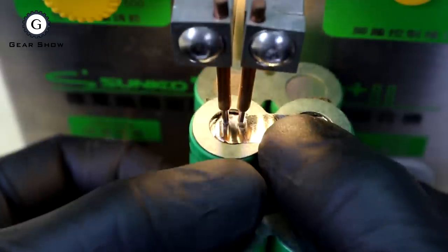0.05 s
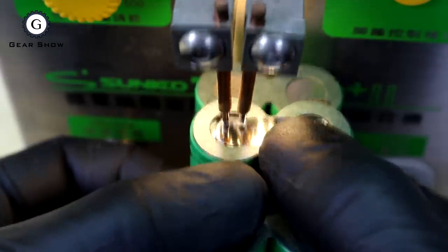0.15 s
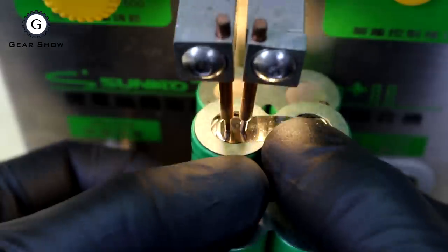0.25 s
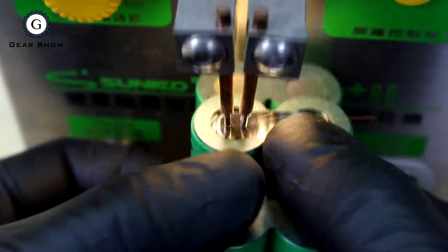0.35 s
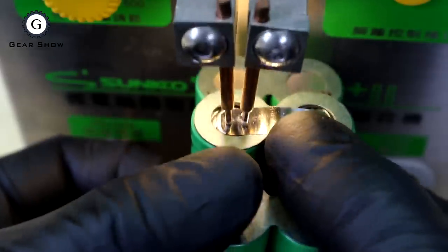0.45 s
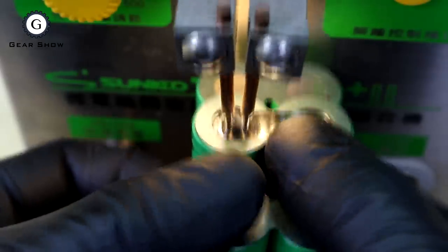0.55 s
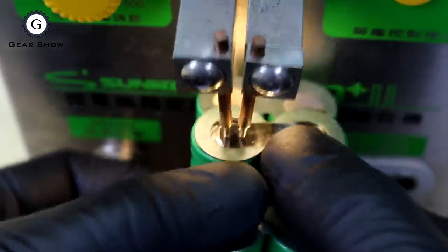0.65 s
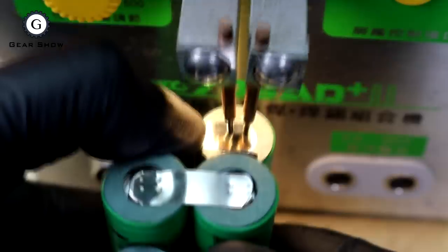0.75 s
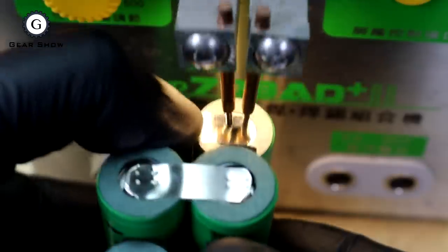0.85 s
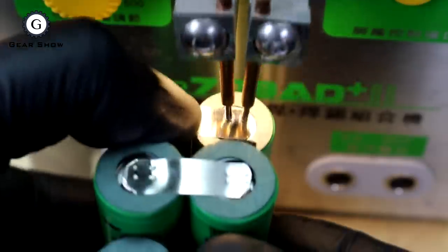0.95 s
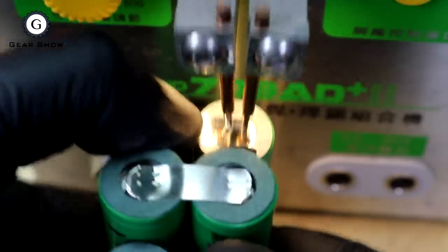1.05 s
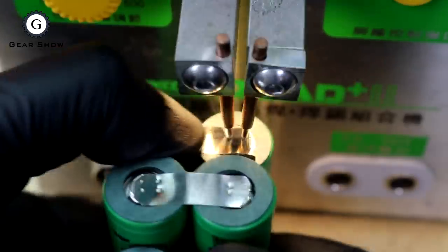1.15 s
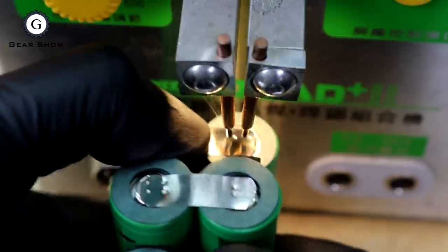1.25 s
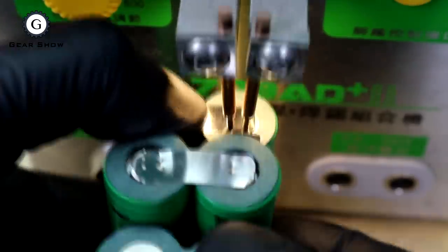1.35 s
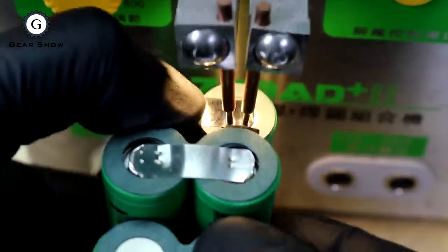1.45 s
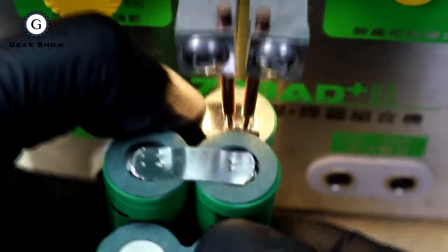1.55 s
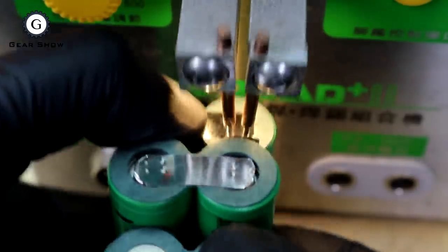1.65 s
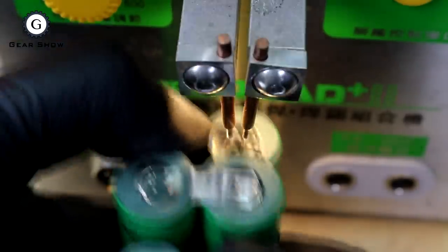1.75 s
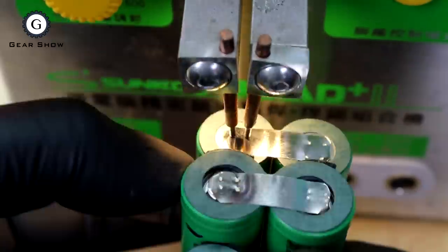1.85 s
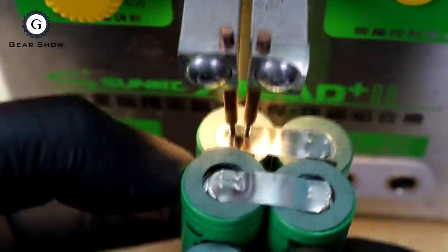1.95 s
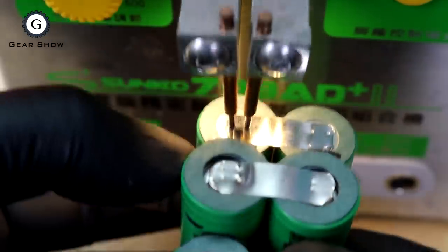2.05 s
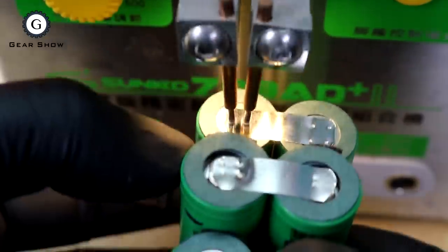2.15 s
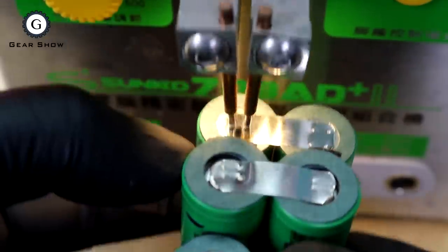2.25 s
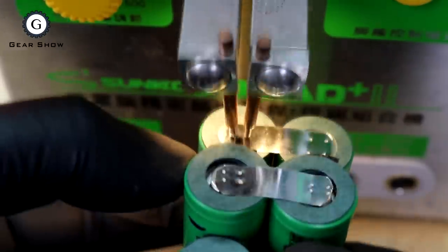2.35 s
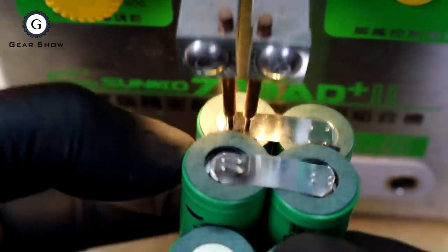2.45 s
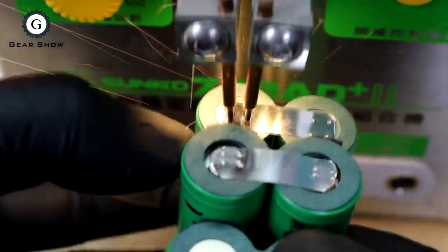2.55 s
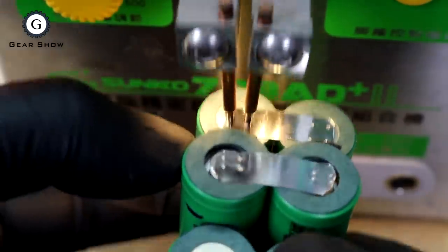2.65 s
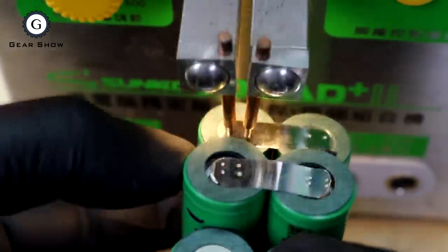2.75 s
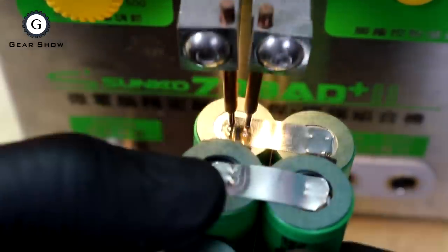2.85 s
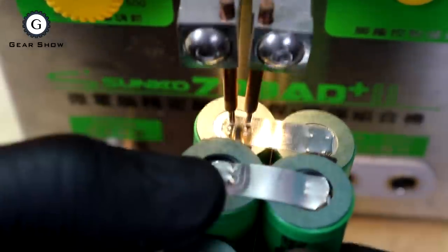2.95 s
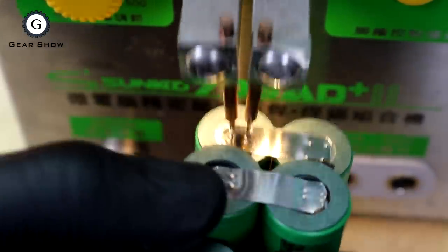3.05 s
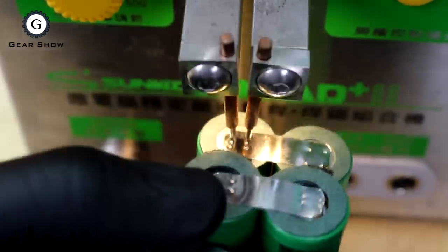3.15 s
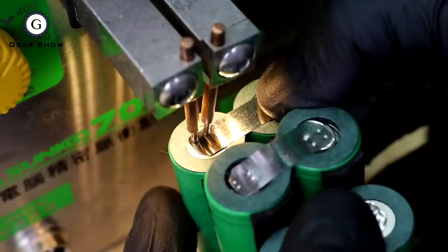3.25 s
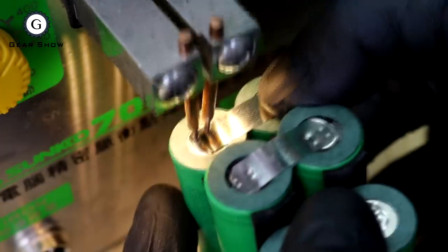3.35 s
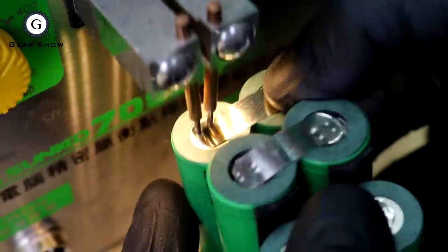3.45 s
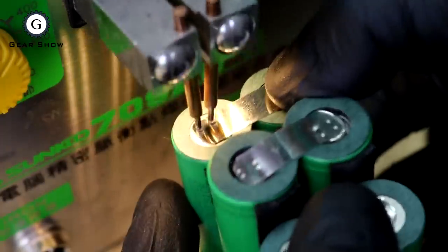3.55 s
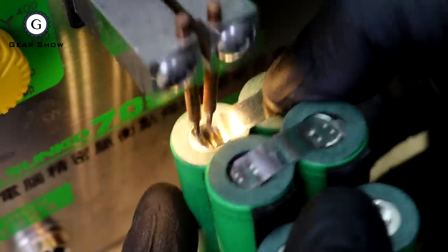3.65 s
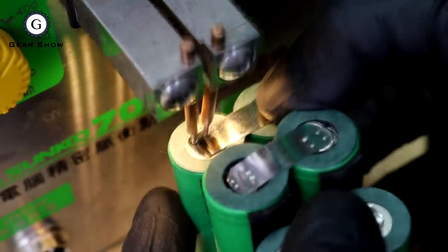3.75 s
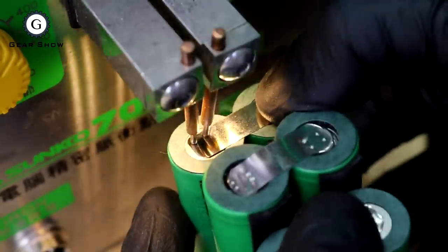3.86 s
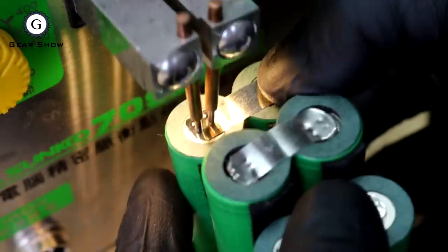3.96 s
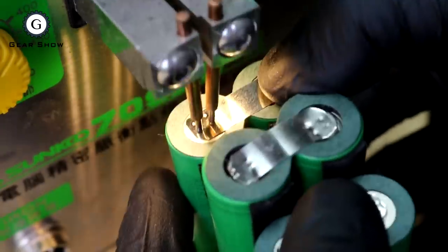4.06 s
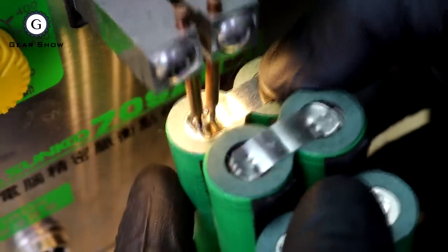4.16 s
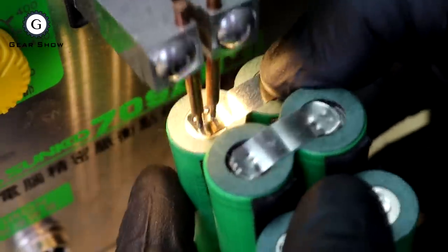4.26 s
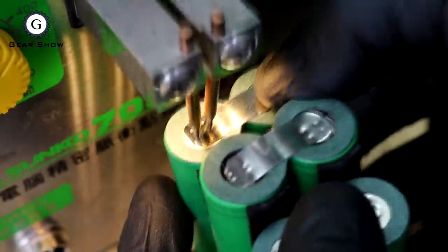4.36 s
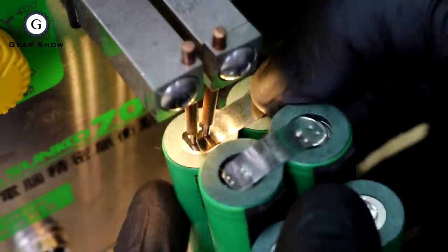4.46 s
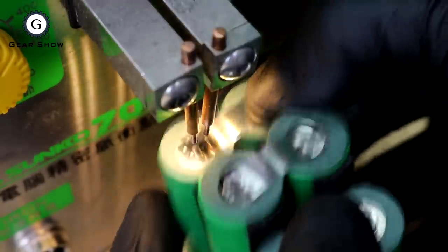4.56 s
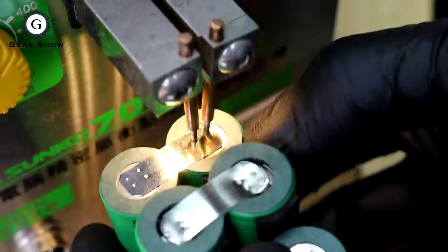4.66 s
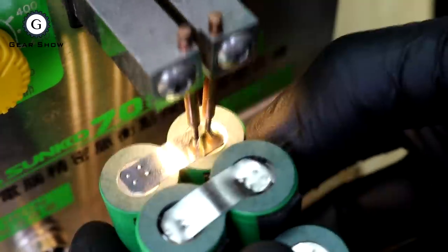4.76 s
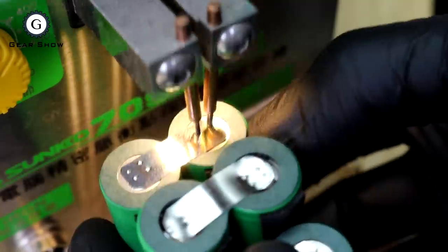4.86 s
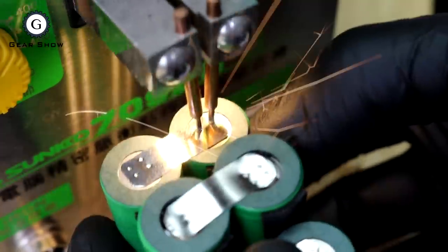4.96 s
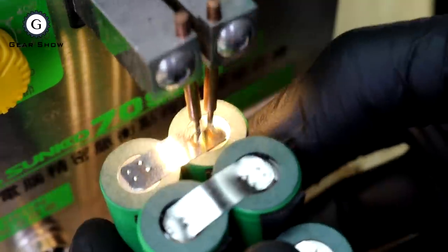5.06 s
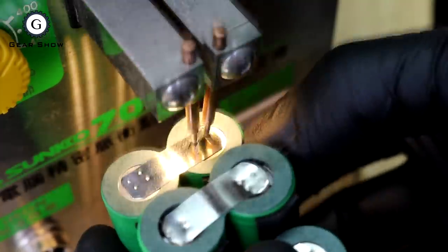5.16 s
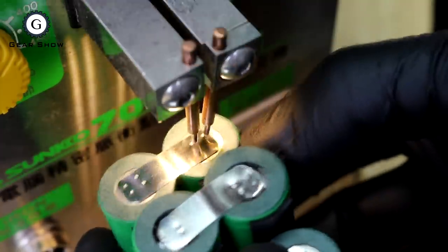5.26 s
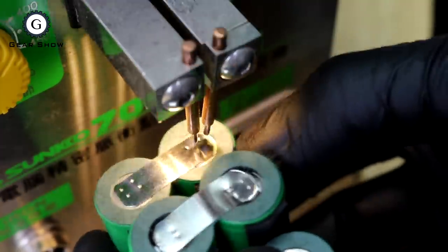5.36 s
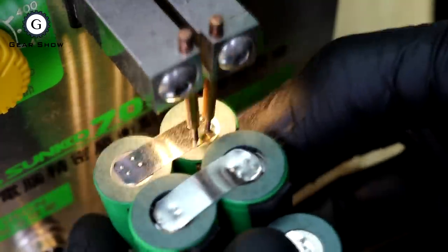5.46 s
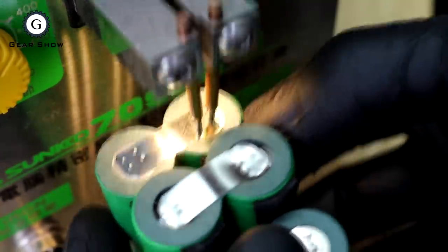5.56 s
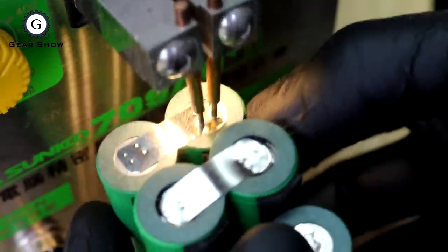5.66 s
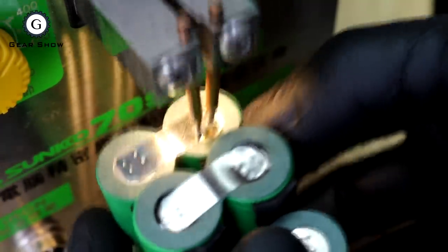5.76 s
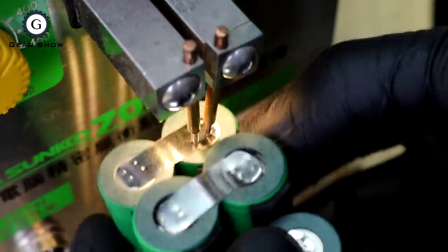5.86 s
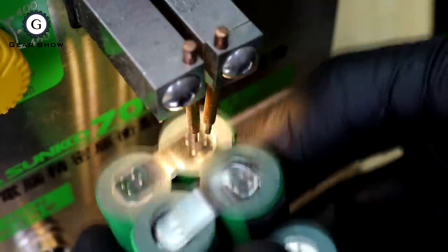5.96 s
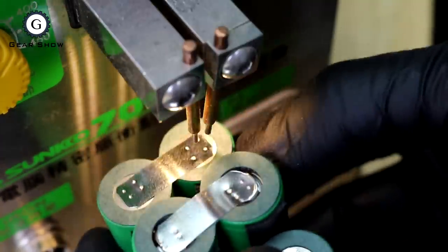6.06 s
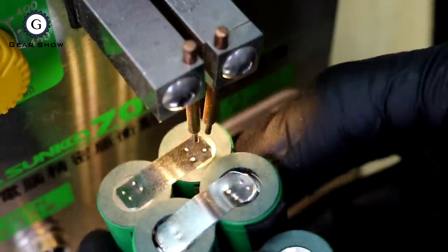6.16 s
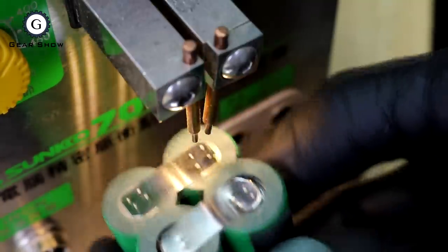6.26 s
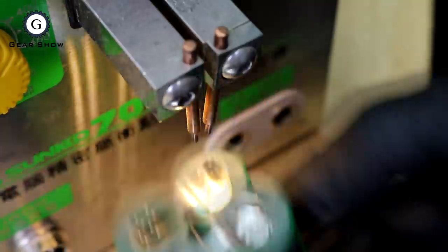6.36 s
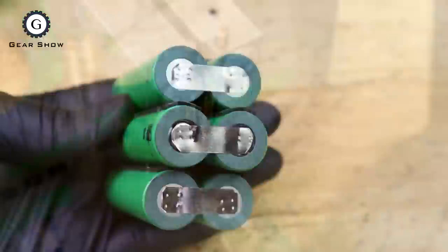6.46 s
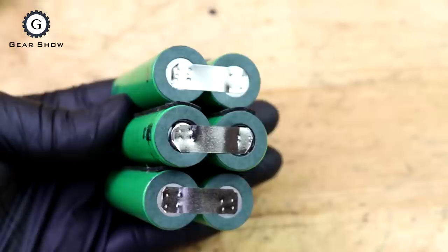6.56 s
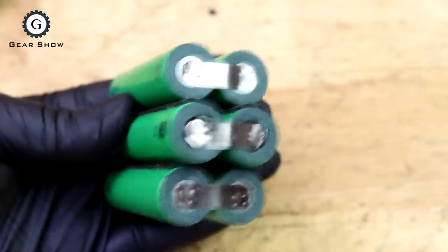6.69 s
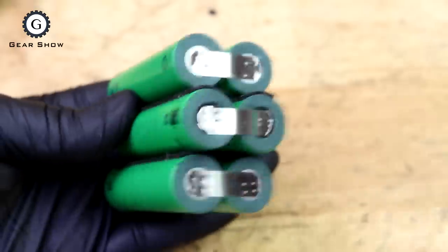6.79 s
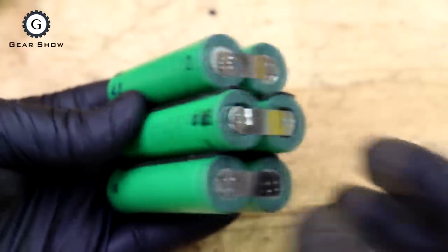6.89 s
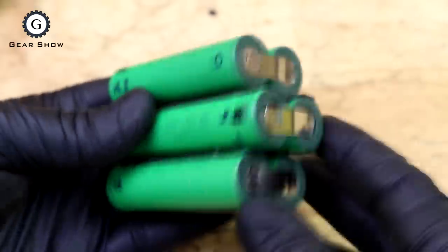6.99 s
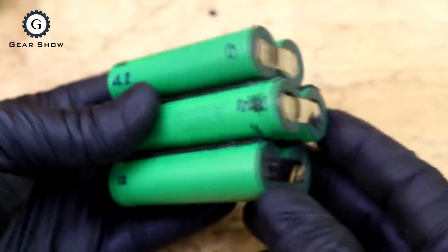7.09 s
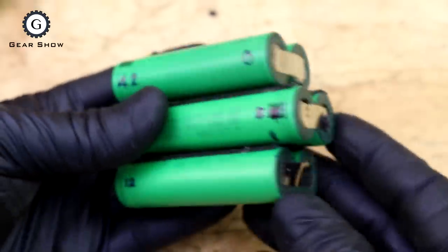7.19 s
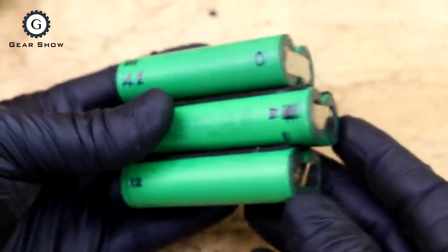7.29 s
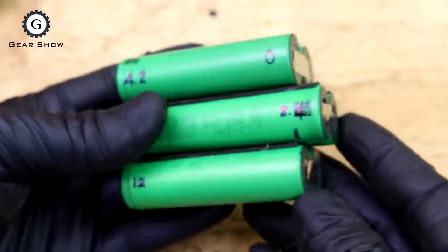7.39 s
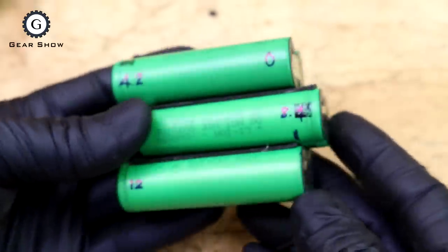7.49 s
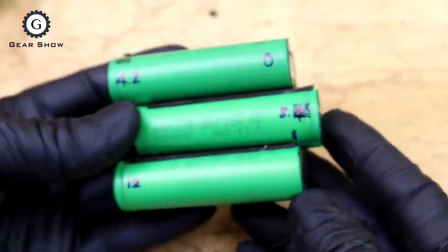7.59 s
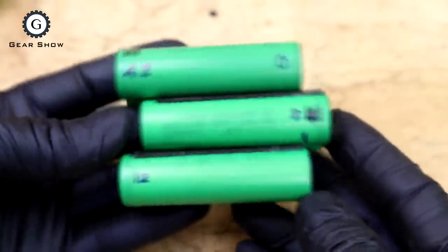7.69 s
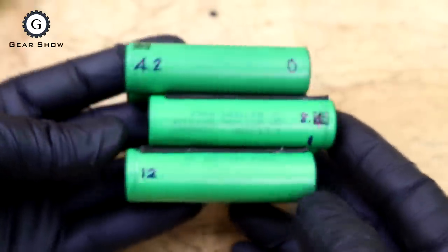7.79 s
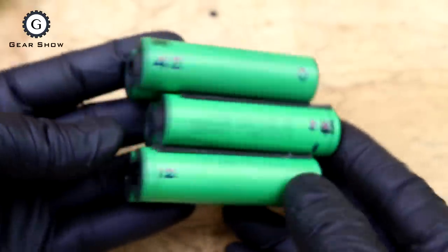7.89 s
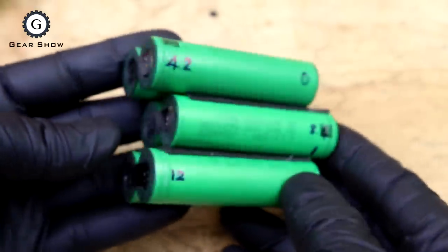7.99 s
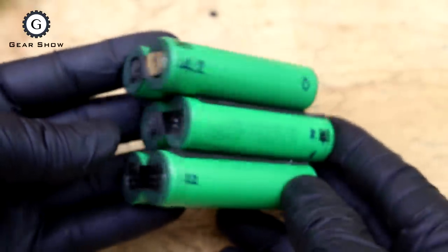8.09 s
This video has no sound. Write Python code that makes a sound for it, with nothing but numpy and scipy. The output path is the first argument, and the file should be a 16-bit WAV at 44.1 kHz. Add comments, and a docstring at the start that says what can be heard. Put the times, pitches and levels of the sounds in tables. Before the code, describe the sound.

A small spot welder fires sharp metallic snaps one after another up close, each followed by a switch click and dull thud, over faint fan whine.

```python
"""A bench spot welder heard close up, weld after weld, the waits between them cut out.
The switch closes and two half-cycles of mains current jolt the steel cabinet: decaying modes and rattling noise.
Sparks crack now and then as damped sines with a noise echo; the switch ticks over and back, as a resonant housing
excited by noise; the arm thuds on its stop through the same cabinet, and loose parts ring on.
Throughout, a fan whines in narrow noise bands over the workshop air; at the end gloves rub in swells of noise."""
import sys
import numpy as np
from scipy import signal
from scipy.fft import rfft, irfft, next_fast_len
from scipy.io import wavfile
from scipy.ndimage import uniform_filter1d

SR = 44100
rng = np.random.default_rng(int(sys.argv[2]) if len(sys.argv) > 2 else 0)


def int16_out(signal):
    """Quantize to a 16-bit WAV file."""
    q = np.round(np.clip(np.atleast_2d(signal).T, -1, 1) * 32767)
    wavfile.write(sys.argv[1], SR, q.astype(np.int16))


def magnitude_from_level(level_db):
    """Linear magnitude for a level in decibels (20 dB per decade)."""
    exponent = np.asarray(level_db, float) / 20
    return 10 ** exponent


N = 358529

# Starts of the sections, in seconds; the last section is away from the welder.
CUT_S = [0, 0.292, 0.773, 1.371, 1.932, 2.491, 2.851, 3.252, 3.972, 4.732, 5.452, 6.552]
# Sparks. Each row: start in seconds, ring level in dB, ring frequency in Hz, ring t60 in seconds,
# echo level in dB.
SPARK_EVENTS = [(0.4589, -11, 3150, 0.013, -62), (2.5865, -1.5, 3150, 0.0054, -27)]


def unit(x):
    """Normalization: a signal divided by its root mean square has rms 1."""
    return x / np.sqrt(np.mean(x ** 2))


def fall(t, t60):
    """Exponential decay: a linearly damped vibration loses 60 dB in each t60."""
    return np.exp(-np.log(1000) * t / np.maximum(t60, 1e-3))


def along(hz, table):
    """Log-frequency interpolation: (Hz, value) rows are joined linearly per octave."""
    at, value = np.transpose(sorted(table))
    return np.interp(np.log(np.maximum(hz, 1)), np.log(at), value)


def noise(db_at):
    """Spectral shaping: white noise is weighted by a given function from Hz to dB."""
    size = next_fast_len(N)
    hz = np.arange(size // 2 + 1) * SR / size
    white = rfft(rng.standard_normal(size))
    return irfft(white * magnitude_from_level(db_at(hz)), size)[:N]


def walk(rate):
    """Slow random modulation: random levels, rate per second, joined by two moving averages."""
    hold = int(SR / rate)
    steps = np.repeat(rng.standard_normal(N // hold + 1), hold)
    return uniform_filter1d(uniform_filter1d(steps, hold), hold)[:N]


def add(out, s, sound):
    """Superposition: a sound is summed in from s seconds; the next cut silences its tail."""
    start = int(s * SR)
    end = min([int(c * SR) for c in CUT_S if c > s] + [N, start + len(sound)])
    out[start:end] += sound[:end - start]


def jolts():
    """Magnetic impulse: each half-cycle of current, and each spark, is a blow (s, dB in five bands)."""
    # Each row: start in seconds, thump in dB, share 0-1 of the thump's power in the second half-cycle,
    # clank (1.6 kHz) in dB, crack (3.2 kHz) in dB.
    welds = [(0.06, -16.5, 0.13, -24, -22.5), (0.457, -25, 0.3, -24.5, -22),
             (0.9374, -19.5, 0.26, -28.5, -32.5), (1.4848, -18, 0, -19.5, -29.5),
             (2.1594, -23, 0.71, -15.5, -25.5), (2.5745, -23.5, 0.9, -16.5, -35.5),
             (2.927, -23.5, 0.92, -21, -33), (3.5611, -18, 0.06, -24.5, -32.5),
             (4.204, -17, 0.04, -24, -35), (4.9876, -17.5, 0.08, -24, -24), (5.6615, -26, 0.24, -26, -30)]
    # 8 kHz drive of the first half-cycle in dB, one value a weld.
    fizz = [-36.5, -35, -37, -38.5, -45, -41, -47, -42, -42.5, -31, -33.5]
    # 800 Hz drive in dB relative to the thump: first and second half-cycle.
    panel_db = (-6.5, -9)
    # Drive of the second half-cycle in dB: at 1.6, 3.2 and 8 kHz.
    later_db = (-22.5, -28, -51.5)
    # Drive from a spark in dB over its echo: at 1600, 350, 800, 3200 and 8000 Hz.
    spark_blow_db = (9.5, -13, -15.5, 1, 5)
    half_cycle_s = 0.0105
    blows = [(s, *(echo_db + np.array(spark_blow_db))) for s, _, _, _, echo_db in SPARK_EVENTS]
    for (s, thump_db, late, clank_db, crack_db), fizz_db in zip(welds, fizz):
        shares = np.clip([1 - late, late], .005, 1)
        first_db, second_db = thump_db + 10 * np.log10(shares)
        blows.append((s, clank_db, first_db, thump_db + panel_db[0], crack_db, fizz_db))
        blows.append((s + half_cycle_s, later_db[0], second_db, thump_db + panel_db[1], *later_db[1:]))
    return blows


def landings():
    """Contact stiffness: the softer the arm lands, the duller the blow (s, dB in five bands)."""
    # The arm knocking and bouncing on its stop. Each row: start in seconds, drive at 350 Hz in dB,
    # softness in dB, drive at 800 Hz in dB.
    thuds = [(0.478, -22.5, 18, -45), (0.6916, -46, -3, -48), (0.7326, -21.5, 17, -41),
             (1.1942, -23, 6, -32.5), (1.2745, -36, 6.5, -60), (1.7423, -22.5, 5, -31),
             (2.082, -44.5, 7, -58), (2.425, -24, 4.5, -33), (2.4532, -28.5, 11, -47),
             (2.805, -24, 5, -31.5), (2.8317, -28, 23, -47), (3.1656, -22, 0, -27.5), (3.84, -26, 7, -42.5),
             (4.5141, -18.5, 9.5, -29), (4.5244, -36.5, -9, -42), (4.5958, -39.5, -0.6, -42.5),
             (5.222, -18.5, 6.5, -28), (5.682, -23, 6, -37.5), (5.9101, -21.5, 4, -26),
             (5.9642, -35.5, 18, -52)]
    # Rows for 1.6, 3.2 and 8 kHz: drive of a hard landing in dB over its 350 Hz,
    # dB lost per dB of softness.
    landing = [(-6.5, 0.91), (-13.5, 1), (-23, 1.1)]
    hard_db, share = np.transpose(landing)
    blows = []
    for s, db, soft_db, panel_db in thuds:
        upper = db + hard_db - share * soft_db
        blows.append((s, upper[0], db, panel_db, *upper[1:]))
    return blows


def cabinet(blows, bass_db, ring_db, head_db, head_s, rise_cycles, scatter, top_db, weight,
            low_rattle_db, knock_db):
    """Modal superposition: every blow rings the same modes, shakes the panels and fills the room."""
    # Frequencies in Hz of the five drive levels of a blow.
    colour_hz = [1600, 350, 800, 3200, 8000]
    # Cabinet modes. Each row: frequency in Hz, relative level in dB, t60 in seconds.
    modes = [(105, 7, 0.19), (152.6, -12, 0.43), (204.5, -6.5, 0.37), (242, -2, 0.53), (272, -5.5, 0.3),
             (346.2, 6, 0.35), (365.7, 7.5, 0.14), (421, 7, 0.2), (473.6, -0.5, 0.3), (614.3, 1.5, 0.17),
             (750.7, 7.5, 0.28), (785.6, 4, 0.36), (952, 1.5, 0.2), (1021, -5, 0.33), (1210, -8.5, 0.084),
             (1166, 3, 0.1), (1430, -4, 0.15), (1551, -2, .3), (1673, 1.5, 0.067), (1693, -3.5, 0.18),
             (2055, -3.5, 0.12), (2270, -6, 0.16), (2560, -15, 0.13), (3027, -12.5, 0.64),
             (3150, -7.5, 0.067), (3353, -5.5, 0.24), (4170, -10.5, 0.26)]
    # Loose panels and the room's answer. Each row: band centre in Hz, relative rattle level in dB,
    # rattle t60 in seconds, relative room level in dB, room t60 in seconds.
    rattle = [(141, -4, 0.029, -12.5, 0.2), (346, -8.5, 0.099, -22, 0.69), (722, -10, 0.035, -14.5, 0.38),
              (1175, -2.5, 0.034, -20, 0.36), (1610, -3, 0.05, -26, 0.52), (2630, -8.5, 0.059, -22, 0.33),
              (3400, -3.5, 0.03, -25.5, .28), (5200, -0.5, 0.02, -26.5, 0.3), (7340, -4, 0.015, -23, .17),
              (9150, -0.5, 0.011, -29, 0.25), (13500, 1, 0.012, -30, 0.2)]
    mode_shift = .018  # full spread of each mode's pitch from blow to blow, as a share
    out, t = np.zeros(N), np.arange(SR // 2) / SR
    hz, db, t60 = np.array(modes).T[:, :, None]
    # a push of finite length: each mode takes some cycles to build
    rings = (1 - np.exp(-t * hz / rise_cycles)) ** 2 * fall(t, t60)
    rings *= magnitude_from_level(db + ring_db + bass_db * (hz < 170) + knock_db * (np.abs(hz - 355) < 35))

    centre, rattle_db, rattle_t60, room_db, room_t60 = np.array(rattle).T[:, :, None]
    shape = magnitude_from_level(rattle_db) * fall(t, rattle_t60)
    shape += magnitude_from_level(room_db) * fall(t, room_t60) * (1 - fall(t, 0.025))
    shape *= magnitude_from_level(low_rattle_db * (centre < 1000) + top_db * (centre > 11000))
    shape *= (1 - np.exp(-t * centre / rise_cycles)) ** 2
    bands = np.array([unit(noise(lambda f: -90 * np.log2(np.maximum(f, 1) / c) ** 2))
                      for c in centre[:, 0]])
    bands = bands * magnitude_from_level(3.8 * walk(300))  # the rattle comes in grains

    chance = rng.random((len(blows), 2 * len(hz) + 1))
    # a blow that follows at once lands on the same spot and starts the modes alike
    for k in np.flatnonzero(np.abs(np.diff(np.array(blows)[:, 0])) < .015):
        chance[k + 1, 1:] = chance[k, 1:]
    for (s, *colour_db), luck in zip(blows, chance):
        colour = list(zip(colour_hz, colour_db))
        start, shift = luck[1:].reshape(2, -1, 1) - .5
        turns = scatter * start + hz * (1 + mode_shift * shift) * t
        ring = magnitude_from_level(along(hz[:, 0], colour)) @ (rings * np.sin(2 * np.pi * turns))
        # a heavier blow puts relatively more into the first knock
        knock = magnitude_from_level(head_db + weight * (colour_db[1] + 25.5))
        ring = ring * (1 + knock * np.exp(-(t / head_s) ** 2))
        at = int(luck[0] * (N - len(t)))
        gains = magnitude_from_level(along(centre[:, 0], colour))
        add(out, s, ring + gains @ (shape * bands[:, at:at + len(t)]))
    return out


def sparks():
    """Impulsive discharge: a few sharp damped cycles, then a noise echo whose treble dies first."""
    # Each row: multiple of the ring frequency, relative level in dB at a ring level of 0 dB.
    partials = [(1, 0), (1.22, -3), (1.54, 0.5), (2.1, -3)]
    edge = 1  # dB that the upper partials lose, beyond the first, per dB of a weaker spark
    rise_s = .00008
    out, t = np.zeros(N), np.arange(SR // 2) / SR
    body_band = signal.butter(2, [2200, 6500], "band", fs=SR, output="sos")
    bright_band = signal.butter(1, [6000, 12000], "band", fs=SR, output="sos")
    for s, db, hz, t60, echo_db in SPARK_EVENTS:
        hiss = rng.standard_normal(len(t))
        body = signal.sosfilt(body_band, hiss)
        bright = signal.sosfilt(bright_band, hiss)
        echo = 0.99 * body * fall(t, 0.38) + 0.43 * bright * fall(t, 0.2)
        sputter = magnitude_from_level(3.3 * walk(370)[:len(t)])
        echo = magnitude_from_level(echo_db) * echo * (1 + 2.5 * fall(t, 0.077)) * sputter
        ring = sum(magnitude_from_level(d + edge * db * (m > 1)) * np.sin(2 * np.pi * m * hz * t) for m, d in partials)
        crack = magnitude_from_level(db) * (1 - np.exp(-t / rise_s)) * fall(t, t60) * ring
        add(out, s, crack + echo)
    return out


def loose_parts():
    """Modulated resonance: a loose part left ringing chatters, so its level and phase waver."""
    # Each row: start in seconds, frequency in Hz, relative level in dB, t60 in seconds.
    pings = [(1.745, 4900, -66, 0.34), (3.179, 5200, -59.5, 0.67), (4.523, 1300, -42.5, 0.37),
             (4.526, 1365, -45, 0.35), (4.525, 5370, -55, 0.22), (5.913, 272, -48, 1.47),
             (5.913, 2040, -65, 1.3), (5.913, 595, -60.5, 1.3)]
    out, t = np.zeros(N), np.arange(SR // 2 + SR // 4) / SR
    chatter = walk(400)
    for s, hz, db, t60 in pings:
        swell = (1 - fall(t, 0.0051)) * (1 + 9.7 * fall(t, 0.041))
        waver = hz / 3200 * chatter[int(s * SR):][:len(t)]  # radians
        add(out, s, magnitude_from_level(db) * swell * fall(t, t60) * np.sin(2 * np.pi * hz * t + waver))
    return out * magnitude_from_level(1.5 * walk(77))


def switch():
    """Source and resonator: decaying contact chatter is convolved with the modes of a plastic housing."""
    # Housing modes. Each row: frequency in Hz, t60 in seconds, relative levels in dB for
    # clicking over, clicking back and closing.
    housing_modes = [(1890, 0.0089, -1, -9.5, -22), (3640, 0.011, 4, -19, -18), (4320, 0.0042, 11, 0, -12),
                     (6040, 0.0006, 10, 2.5, 3), (7500, 0.0028, -10, 5, -8), (8460, 0.005, 3, 1.5, 0.5),
                     (9870, 0.016, -11.5, -19, -14), (11100, 0.0008, 9, -3, 4), (12500, 0.004, -6, -2, -8),
                     (14800, 0.0027, -8, -9, 4)]
    # Times in seconds of the switch clicking over after a weld, clicking back, and closing before one.
    over_s = [0.2525, 0.629, 1.1259, 1.619, 2.3299, 2.7378, 3.079, 3.717, 4.371, 5.127, 5.8179]
    back_s = [0.675, 1.156, 1.6865, 2.3737, 2.7693, 3.124, 3.7569, 4.43, 5.1827, 5.871]
    close_s = [0.058, 0.4568, 0.9323, 1.477, 2.1565, 2.567, 2.9245, 3.558, 4.199, 4.983, 5.653]
    out, t = np.zeros(N), np.arange(SR // 8) / SR
    hz, t60, over_db, back_db, close_db = np.array(housing_modes).T[:, :, None]
    # times, peak dB, mode levels, chatter t60 in seconds
    actions = [(over_s, -33, over_db, .04), (back_s, -34.5, back_db, .035), (close_s, -36, close_db, .03)]
    for clicks, peak_db, db, chatter_t60 in actions:
        for s in clicks:
            chance = rng.standard_normal(len(t))
            detune = 1 + .03 * chance[-len(hz):, None]
            housing = np.sum(magnitude_from_level(db) * fall(t, t60) * np.sin(2 * np.pi * hz * detune * t), axis=0)
            # the second decay is the short tail of the room
            chatter = chance * (fall(t, chatter_t60) + 0.12 * fall(t, 0.24))
            click = signal.fftconvolve(chatter, housing)
            add(out, s, magnitude_from_level(peak_db) * click / np.abs(click).max())
    return out


def ticks():
    """Band-limited impulse: short noise bursts through a band-pass give dry clicks of a few ms."""
    # Small parts of the moving arm. Each row: start in seconds, peak in dB, nominal frequency in Hz.
    arm_ticks = [(1.723, -48, 5500), (5.232, -42, 7500), (5.7, -42, 6300), (5.914, -45, 8000),
                 (5.938, -44, 7500)]
    out, t = np.zeros(N), np.arange(SR // 40) / SR
    for s, db, hz in arm_ticks:
        burst = rng.standard_normal(len(t)) * fall(t, .015)
        band = signal.butter(2, [hz / 1.5, hz * 1.2], "band", fs=SR, output="sos")
        click = signal.sosfilt(band, burst)
        add(out, s, magnitude_from_level(db) * click / np.abs(click).max())
    return out


def gloves():
    """Friction noise: gloves rubbing on the cells make short, grainy swells of band noise."""
    # Each row: middle in seconds, time from the middle to 1/e in seconds, relative level in dB,
    # centre in Hz, octaves from the centre to -10 dB.
    rubs = [(6.48, 0.059, -60.5, 2600, 1.9), (6.703, .03, -63, 3200, 0.58),
            (7.095, 0.0026, -61, 7400, 0.77), (7.26, 0.035, -71, 1990, 0.45), (7.9, 0.03, -69, 2300, 0.78)]
    t, out = np.arange(N) / SR, np.zeros(N)
    for s, length, db, hz, width in rubs:
        rub = unit(noise(lambda f: -10 * (np.log2(np.maximum(f, 1) / hz) / width) ** 2))
        out += magnitude_from_level(db) * np.exp(-((t - s) / length) ** 2) * rub
    return out * magnitude_from_level(1.6 * walk(60))


def air():
    """Diffuse field: workshop air and hiss as mid and side noise, and a wavering fan whine in the middle."""
    # Spectrum of the air. Each row: frequency in Hz, relative density in dB per Hz.
    air_spectrum = [(15, -26), (25, -14.5), (92, -16.5), (130, -5), (301, -12.5), (335, -12.5),
                    (503, -13.5), (734, -18.5), (2110, -23), (3080, -23.5), (3430, -21.5), (3920, -25.5),
                    (16000, -29)]
    # Width of the air. Each row: frequency in Hz, side minus mid in dB.
    air_side = [(62, -5), (110, -24), (200, -14.5), (380, -15.5), (700, -9), (1290, -8), (2380, -5),
                (4400, -1.5), (8120, -0.5), (15000, 1)]
    # Fan and hum. Each row: centre in Hz, width between -6 dB points in Hz, mean level in dB
    # at the welder, mean level in dB away from it.
    whine = [(3410, 230, -70.5, -73.5), (2880, 120, -83, -87), (131, 100, -73.5, -74.5),
             (203, 16, -84.5, -81.5), (300, 40, -82, -87), (435, 20, -86.5, -82.5), (500, 16, -92, -80.5),
             (2055, 20, -96.5, -90)]
    mid = noise(lambda f: along(f, air_spectrum))
    side = noise(lambda f: along(f, air_spectrum) + along(f, air_side))
    near = np.arange(N) / SR < CUT_S[-1]
    mid_db = np.where(near, -61, -64)
    fan = np.zeros(N)
    for hz, w, near_db, away_db in whine:
        band = unit(noise(lambda f: -20 * np.log10(1 + (2 * (f - hz) / w) ** 2)))
        fan += magnitude_from_level(np.where(near, near_db, away_db) + 3.5 * walk(2.3)) * band
    stereo = mid + side * np.array([[1], [-1]])
    return magnitude_from_level(mid_db) * stereo / np.std(mid) + fan


def scene():
    """Linear superposition: all sources are summed, with the welder and the hands in the middle."""
    # scatter is the spread of the starting phases in turns: the arm starts the modes nearly in step
    welds = cabinet(jolts(), bass_db=3.0, ring_db=-19.5, head_db=12.5, head_s=0.011, rise_cycles=1.22,
                    scatter=0.72, top_db=-1.0, weight=0.055, low_rattle_db=-3.5, knock_db=-0.7)
    stops = cabinet(landings(), bass_db=-7.5, ring_db=-22, head_db=6.0, head_s=0.027, rise_cycles=0.46,
                    scatter=.12, top_db=-12, weight=0.71, low_rattle_db=-4.5, knock_db=2.5)
    # a small cabinet radiates little deep bass
    high_pass = signal.butter(2, 70, "high", fs=SR, output="sos")
    welder = signal.sosfilt(high_pass, welds + stops)
    return welder + sparks() + loose_parts() + switch() + ticks() + gloves() + air()


def roll_off(x):
    """The treble ends steeply here."""
    return signal.sosfilt(signal.butter(12, 16500, fs=SR, output="sos"), x)


def record(dry):
    """Gating and low-pass filtering: the sound fades out and in at each cut, and the top is cut off."""
    t, fade_s = np.arange(N) / SR, 0.0058
    fades = np.prod([np.clip(np.abs(t - s) / fade_s, 0, 1) for s in CUT_S[1:]], axis=0)
    low_pass = signal.ellip(8, .2, 50, 15300, fs=SR, output="sos")
    mix = signal.sosfilt(low_pass, dry * fades)
    return roll_off(np.clip(mix, -1, 1))


dry = scene()
out = record(dry)
int16_out(out)
```